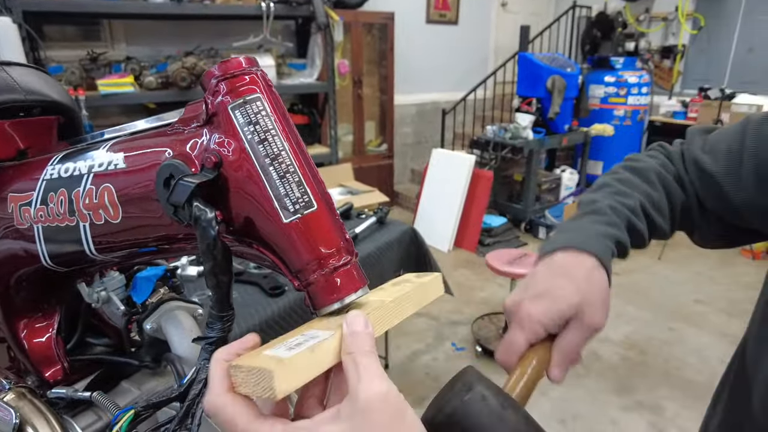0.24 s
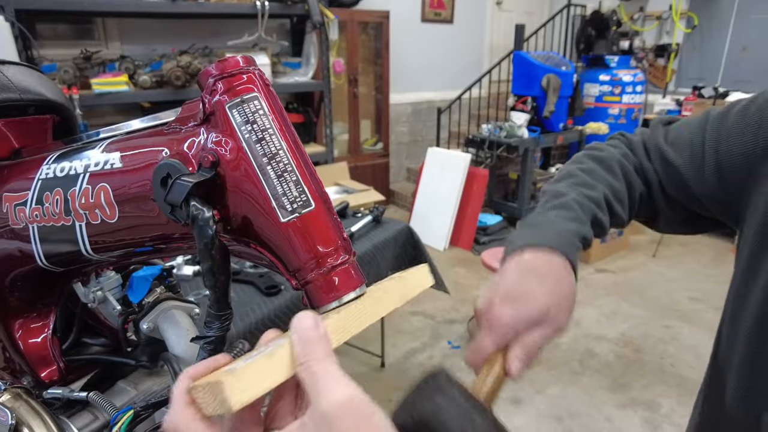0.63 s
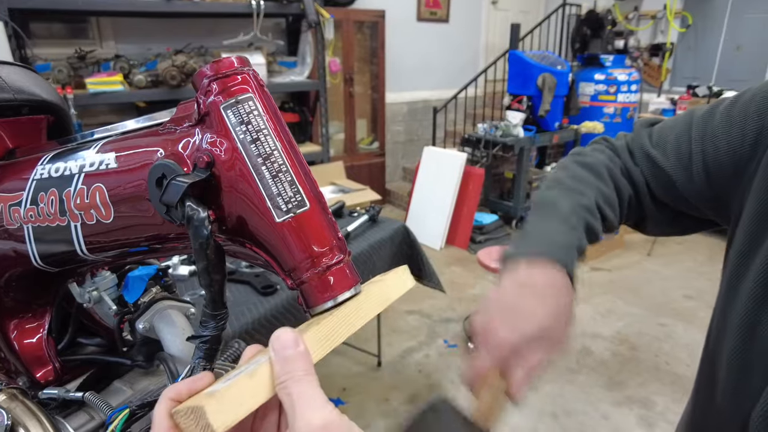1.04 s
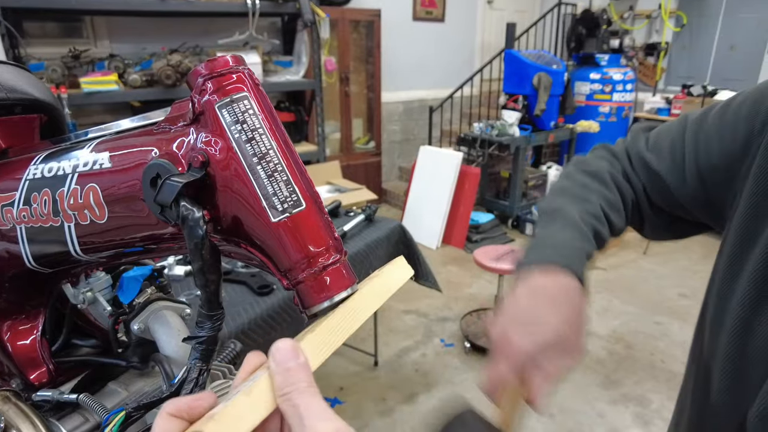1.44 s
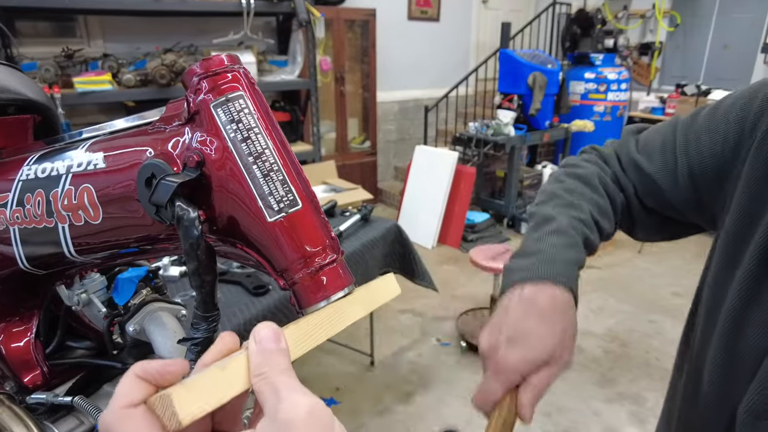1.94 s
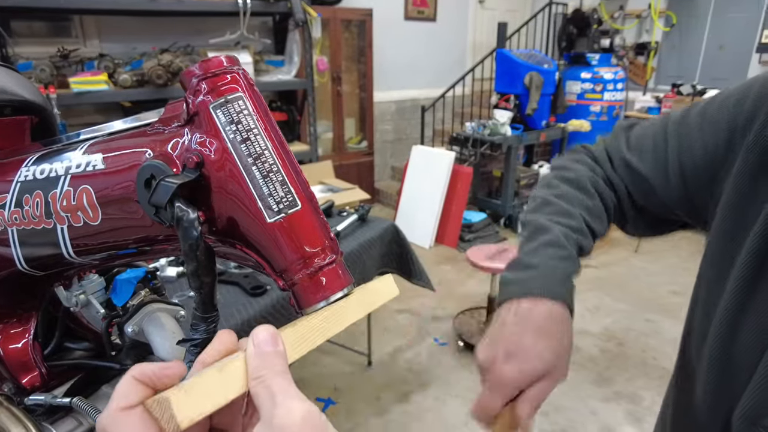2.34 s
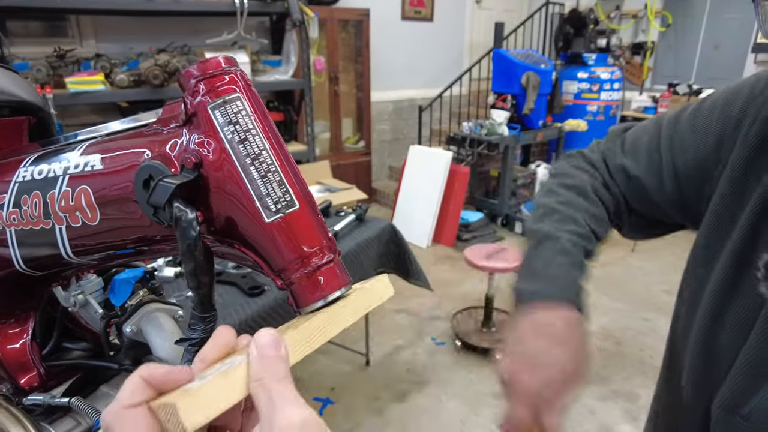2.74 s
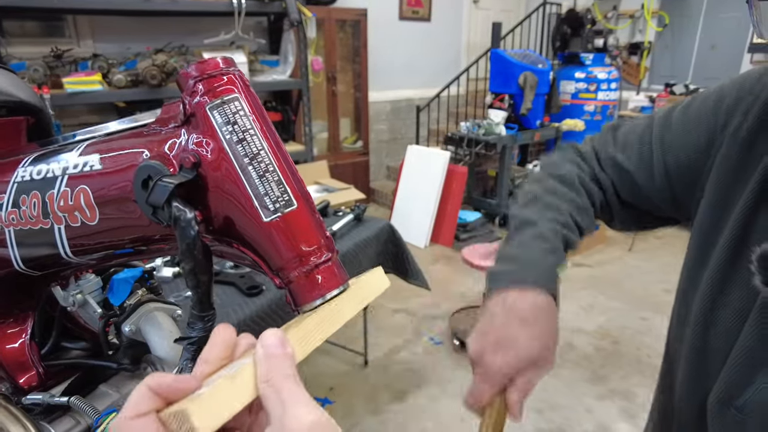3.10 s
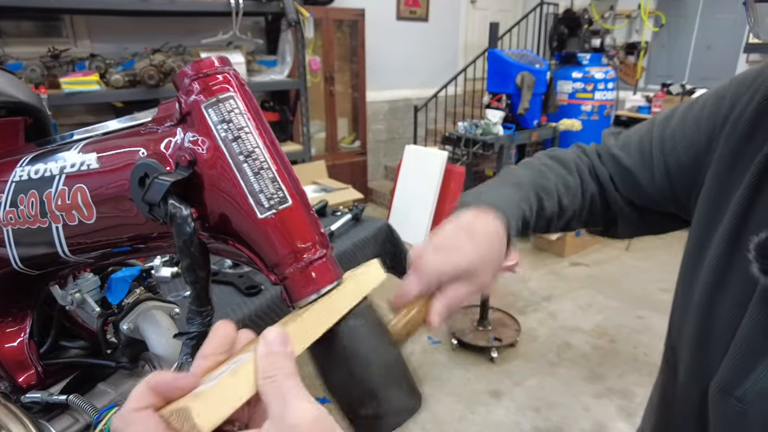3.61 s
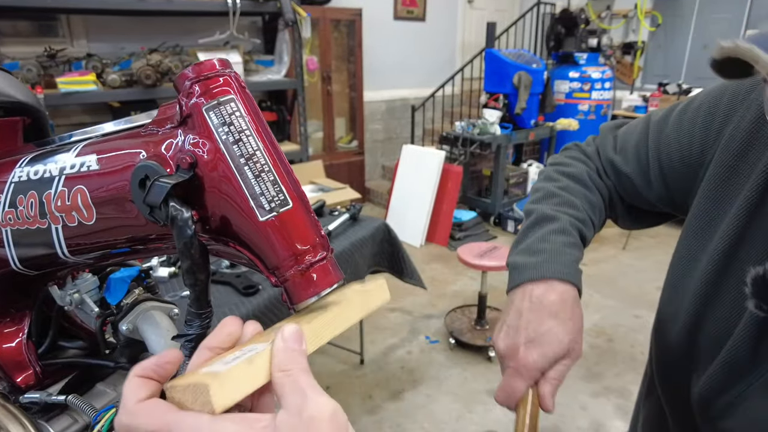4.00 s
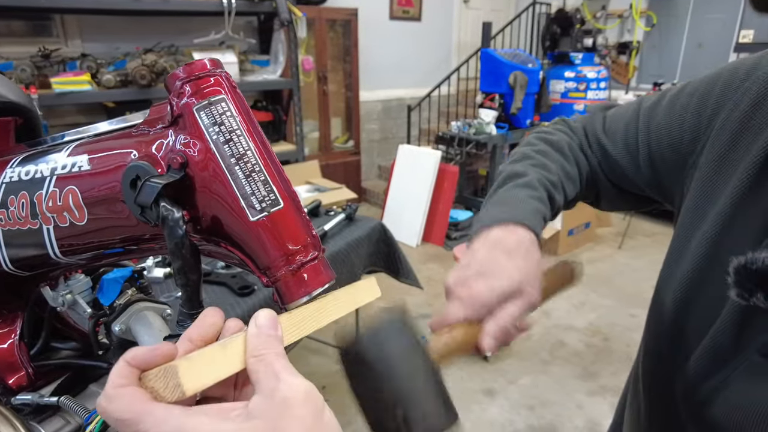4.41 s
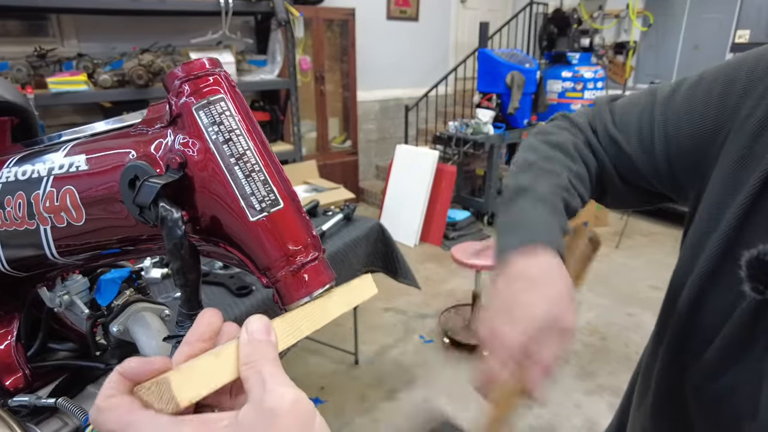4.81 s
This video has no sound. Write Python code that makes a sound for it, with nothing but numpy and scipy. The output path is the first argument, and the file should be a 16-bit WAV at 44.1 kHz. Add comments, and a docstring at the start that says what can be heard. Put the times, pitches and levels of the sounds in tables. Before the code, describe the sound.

A rubber mallet hits a wooden block held against a steel frame, heard close up in a concrete workshop. At the start, the tail of an earlier blow fades, and the block taps lightly at about 0.5 seconds. From 0.9 to 3.6 seconds come eight sharp, hollow knocks, evenly spaced at nearly three a second. The one at 1.8 seconds is clearly softer, and the later ones are firm. Each knock leaves a faint metallic hum and a short room echo. The hammering pauses while the block taps softly against the frame around 4.0 and 4.2 seconds. One more solid knock lands at 4.7 seconds and dies away. Between blows a sleeve rustles very faintly, and a slight low rumble of air comes with each swing, over a very quiet background hush.

```python
"""Mallet on a wooden block

A rubber mallet knocks a wooden block held against a steel frame in a concrete workshop.
The block's modes give a short hollow knock, the frame rings on faintly, the room carries the tail.
Between blows the block taps the frame and a sleeve rustles. Moving air rumbles at the microphone,
swelling with each swing, over a steady hush that dips briefly."""
import sys
import numpy as np
from scipy import signal
from scipy.fft import rfft, irfft, next_fast_len
from scipy.io import wavfile
from scipy.ndimage import uniform_filter1d

SR = 44100
rng = np.random.default_rng(int(sys.argv[2]) if len(sys.argv) > 2 else 0)


def put_to_file(sound):
    """Save the sound as 16-bit audio at rate SR, in the file named by the first command-line argument."""
    columns = np.atleast_2d(sound).T  # one column per channel
    safe = np.clip(columns, -1, 1)
    whole_steps = np.round(safe * 32767)
    wavfile.write(sys.argv[1], SR, whole_steps.astype(np.int16))


N = 222749
LEAD = SR // 2  # samples before the start, so an earlier blow still rings

# mallet blows (time [s], knock [dB], pitch [Hz], then
# hollow, slap, tick, crack, lower hum, upper hum, steel ring [dB re knock])
BLOWS = [(-.17, -12, 745, -15, -2.5, 1, -15.5, -36, -22, -58),
         (0.94, -10.5, 755, -2.5, -6.5, -8, -20, -48, -29, -68),
         (1.2902, -6.5, 747, -18, -4.5, -8, -17.5, -30.5, -25, -54),
         (1.7601, -17.5, 683, -4, -11, -15.5, -23.5, -27.5, -23, -62),
         (2.095, -6.5, 814, -17.5, -4.5, -5, -17, -22.5, -24, -54),
         (2.4876, -7.5, 738, -15.5, -1.5, 2, -12.5, -29, -18.5, -45),
         (2.8685, -5.5, 702, -10, -7, -4.5, -15, -30.5, -20.5, -45.5),
         (3.2389, -6, 737, -13, 1, -4, -14, -26, -25.5, -50.5),
         (3.6167, -3.5, 793, -7, -9, -6, -18.5, -24.5, -33.5, -53),
         (4.6954, -8, 822, -9, -9.5, -11.5, -21, -42, -33, -61)]
# block set against the frame (time [s], knock [dB], pitch [Hz], then thud, slap, tick [dB re knock])
TAPS = [(0.4853, -33.5, 740, -10.5, -10, -12), (3.9753, -37.5, 666, -2.5, -16, -24),
        (4.026, -42, 867, -6, -4.5, -9), (4.2232, -36.5, 767, -10, -20, -14)]
# hand-damped modes of block and mallet head (frequency [Hz], level [dB], t60 [s])
THUD_MODES = [(81, -16, 0.13), (110, -4, 0.22), (146.5, -0.5, 0.15), (174.1, 4, 0.09), (276, -0.5, 0.072),
              (372.8, 2.5, 0.078)]
KNOCK_MODES = [(568, -2.5, 0.028), (653, 2, 0.027), (738.3, 5, 0.03), (872, 4, 0.024), (959, 3.5, 0.014)]
SLAP_MODES = [(1170, -4, 0.019), (1375, 0, 0.046), (1436, 3, 0.025), (1911, 2.5, 0.017)]
TICK_MODES = [(2273, 1.5, 0.017), (2750, -0.5, .013), (3260, -6, 0.0086)]
# main block mode, ringing on in a loose grip (frequency [Hz], level [dB], t60 [s])
HOLLOW_MODE = [(747.5, -2, .1)]
# contact noise; the snap is its first, brightest instant (frequency [Hz], level [dB])
CRACK_SPECTRUM = [(2500, -8.5), (3600, -1), (4500, -6), (5500, -1.5), (7500, -5.5), (9000, -10),
                  (11000, -27), (13000, -25.5), (16000, -37.5)]
SNAP_SPECTRUM = [(3000, -17.5), (7000, -4.5), (11000, -8.5), (13000, -8), (16000, -20)]
# steel frame modes (frequency [Hz], level [dB], t60 [s])
LOWER_HUM_MODES = [(287.8, 0, 0.97), (307, 0.5, 1), (334, -9, 1)]
UPPER_HUM_MODES = [(353.2, -6, 1), (365.6, 1, 0.64), (376.3, 0.5, 0.87), (385, -2.5, 0.68),
                   (552, -5.5, 0.57), (794, -14.5, 0.32)]
CLANG_MODES = [(1402, -29, 0.45), (1433, -25.5, .6), (1476, -28.5, 0.4), (1895, -30, 0.28),
               (2234, -32.5, .35)]
STEEL_MODES = [(13400, -8.5, .33), (13840, -3, .3), (14180, -18.5, .25)]
# near surfaces (delay [s], level [dB])
ECHOES = [(.0043, -7.5), (.0078, -10.5), (0.0116, -4.5), (0.0145, -15), (0.0177, -12), (.0246, -12.5),
          (0.0313, -10.5)]
# room decay (frequency [Hz], t60 [s])
ROOM_T60 = [(60, 1), (160, 0.75), (420, 0.61), (1100, 0.79), (1500, 0.83), (2900, 0.66), (7700, 0.55),
            (14000, 0.28)]
# tail colour (frequency [Hz], level [dB])
ROOM_SPECTRUM = [(60, 3), (150, 6.5), (350, 9), (750, 1), (1100, 1.5), (1500, 1.5), (2500, -6.5),
                 (4300, -10), (6500, -5), (10000, -14), (15000, -39)]
# band centres (thud, knock, slap, tick, crack [Hz])
BANDS_HZ = [200, 750, 1600, 2600, 6000]
# slow jolt of the microphone stand and a lingering low room boom
# (frequency [Hz], level [dB re knock], t60 [s])
LOW_MODES = [(15, -21.5, .3), (78.4, -34.5, 0.83)]
# moving air (frequency [Hz], level [dB])
AIR_SPECTRUM = [(3, -29), (10, 2), (25, -9), (65, -19), (130, -41), (20000, -86)]
# background hush (frequency [Hz], level [dB])
HUSH_SPECTRUM = [(35, -25.5), (60, -10), (168, -19), (301, -11), (700, -17), (3000, -31), (4000, -40),
                 (5000, -31.5), (7000, -40), (13000, -48.5), (15500, -63)]
# hush envelope (time [s], level [dB])
HUSH_LEVELS = [(0, -57.5), (.74, -65.5), (0.899, -73.5), (.95, -62.5), (5.05, -62)]
# sleeve and hand sliding (time [s], length [s], level [dB])
RUSTLES = [(0.088, 0.089, -71.5), (0.305, 0.057, -72.5), (0.49, 0.072, -72.5), (.68, 0.085, -74.5),
           (1.245, 0.028, -71), (1.666, 0.056, -73), (2.004, 0.043, -74), (2.418, 0.076, -73),
           (2.81, 0.1, -75), (3.18, .04, -69), (3.532, 0.056, -71.5), (4.077, 0.037, -80),
           (4.381, 0.04, -76), (4.555, 0.091, -78)]
RUSTLE_HZ = 6670
# cloth friction (frequency [Hz], level [dB])
RUSTLE_SPECTRUM = [(500, -24), (0.34 * RUSTLE_HZ, -12), (0.97 * RUSTLE_HZ, 0), (1.2 * RUSTLE_HZ, 0),
                   (1.6 * RUSTLE_HZ, -14), (20000, -40)]

KNOCK_REF_HZ = 745  # pitch at which knock and hollow modes are listed; the grip shifts them
THUD_DB, THUD_PER_KNOCK_DB = -7, -0.32  # softer blows are duller
TAIL_DB, TAIL_PER_CRACK_DB = 7, 0.4029  # a harder crack excites more room
CRACK_T60_S, SNAP_T60_S, SNAP_RE_CRACK_DB = 0.03, 0.005, -10.5
AIR_DB, GUST_RE_KNOCK_DB, GUST_LEAD_S, GUST_WIDTH_S = -56.5, -42, 0.044, 0.085
LAST_SWING_S, LAST_SWING_DB = 5.09, -6  # gust only, under way at the end
HEADROOM, CUTOFF_HZ = 1.3, 16300


def amp(db):
    return 10 ** (np.asarray(db) / 20)


def unit_rms(x):
    return x / np.sqrt(np.mean(x ** 2) + 1e-20)


def curve_at(points, hz):
    """Interpolate over log frequency."""
    points_hz, values = np.transpose(points)
    return np.interp(np.log(hz + 1), np.log(points_hz + 1), values)


def add(mix, time_s, sound):
    part = mix[round(time_s * SR) + LEAD:][:len(sound)]
    part += sound[:len(part)]


def noise(spectrum, size):
    """Coloured noise, rms 1."""
    fft_size = next_fast_len(size)
    gain = amp(curve_at(spectrum, np.fft.rfftfreq(fft_size, 1 / SR)))
    return unit_rms(irfft(rfft(rng.standard_normal(fft_size)) * gain, fft_size)[:size])


def flutter(size, depth_db, smooth_samples):
    """Randomly wavering gain."""
    return amp(depth_db * unit_rms(uniform_filter1d(rng.standard_normal(size), smooth_samples)))


def ring(modes, t, rise_s, shift=1):
    """Damped sines that swell during contact."""
    hz, db, t60_s = np.transpose(modes)[:, :, None]
    sines = amp(db - 60 * t / t60_s) * np.sin(2 * np.pi * hz * shift * t)
    return sines.sum(0) * (1 - np.exp(-t / rise_s)) ** 2


def near_echoes(x):
    """Bench, floor and wall reflections; block and arms stand a little differently each time."""
    response = np.zeros(SR // 10)
    for delay_s, db in ECHOES:
        level_jitter, delay_jitter = rng.standard_normal(2)
        response[round(abs(delay_s + 0.0003 * delay_jitter) * SR)] += amp(db + 1.1 * level_jitter)
    return signal.fftconvolve(x, response)[:len(x)]


def wood_block(t, pitch_hz, thud_db, slap_db, tick_db, crack_db, echo_db):
    """Wood modes and contact noise, with near echoes."""
    wood = ring(KNOCK_MODES, t, rise_s=0.00085, shift=pitch_hz / KNOCK_REF_HZ)
    wood += amp(thud_db) * ring(THUD_MODES, t, rise_s=0.0031)
    wood += amp(slap_db) * ring(SLAP_MODES, t, rise_s=0.00057)
    wood += amp(tick_db) * ring(TICK_MODES, t, rise_s=0.00064)
    crack = amp(crack_db - 60 * t / CRACK_T60_S) * noise(CRACK_SPECTRUM, len(t))
    crack *= 1 - np.exp(-t / 0.00023)
    echoes = amp(echo_db) * near_echoes(0.49 * wood + 0.79 * crack)  # rough surfaces return less treble
    snap = amp(crack_db + SNAP_RE_CRACK_DB - 60 * t / SNAP_T60_S) * noise(SNAP_SPECTRUM, len(t))
    return 0.59 * wood + 1.29 * crack + echoes + snap


def steel_frame(t, slap_db, lower_db, upper_db, steel_db):
    """Frame modes: two hums, a clang that follows the slap, a fluttering high ring."""
    hum = amp(lower_db) * ring(LOWER_HUM_MODES, t, rise_s=0.013)
    hum += amp(upper_db) * ring(UPPER_HUM_MODES, t, rise_s=0.0055)
    clang = amp(slap_db) * ring(CLANG_MODES, t, rise_s=0.005)
    high_ring = amp(steel_db) * ring(STEEL_MODES, t, rise_s=0.006)
    return hum + clang + high_ring * flutter(len(t), depth_db=4, smooth_samples=400)


def room_tail(t, thud_db, slap_db, tick_db, crack_db):
    """Dense echoes blur the modes into broad bands, each decaying at its own rate."""
    pulses = np.zeros(len(t))
    slots = np.arange(0, len(t) - 10, 10)
    pulses[slots + rng.integers(0, 10, len(slots))] = rng.choice([-1., 1.], len(slots))
    hz, frame_s, bands = signal.stft(pulses, SR, nperseg=512)
    balance = np.transpose([BANDS_HZ, [thud_db, 0, slap_db, tick_db, crack_db]])
    colour = amp(curve_at(ROOM_SPECTRUM, hz) + curve_at(balance, hz))
    decay = amp(-60 * frame_s / curve_at(ROOM_T60, hz)[:, None])
    _, tail = signal.istft(bands * colour[:, None] * decay, SR, nperseg=512)
    build_up = 1 - np.exp(-t / 0.0032)
    return tail[:len(t)] * build_up


def impact(knock_db, pitch_hz, bands_db, frame_db, tail_db, echo_db=0):
    """Block, frame and room together, faded out over 0.5 s."""
    thud_db, slap_db, tick_db, crack_db = bands_db
    t = np.arange(SR // 2) / SR
    block = wood_block(t, pitch_hz, thud_db, slap_db, tick_db, crack_db, echo_db)
    frame = steel_frame(t, slap_db, *frame_db)
    room = amp(tail_db) * room_tail(t, *bands_db)
    fade = np.sqrt(abs(np.cos(np.pi * t)))
    return amp(knock_db) * (block + frame + room) * fade


def mallet_blow(knock_db, pitch_hz, hollow_db, slap_db, tick_db, crack_db, *frame_db):
    """Full impact, plus hollow ring, slow jolt of the microphone stand and low room boom."""
    thud_db = THUD_DB + THUD_PER_KNOCK_DB * knock_db
    tail_db = TAIL_DB + TAIL_PER_CRACK_DB * crack_db
    struck = impact(knock_db, pitch_hz, (thud_db, slap_db, tick_db, crack_db), frame_db, tail_db)
    t = np.arange(len(struck)) / SR
    hollow = amp(hollow_db) * ring(HOLLOW_MODE, t, rise_s=0.0012, shift=pitch_hz / KNOCK_REF_HZ)
    lows = ring(LOW_MODES, t, rise_s=0.012) * np.cos(np.pi * t)
    return struck + amp(knock_db) * (hollow + lows)


def air_rumble(t):
    """Low air noise; each swing pushes a gust ahead of the blow."""
    swings = [row[:2] for row in BLOWS] + [(LAST_SWING_S, LAST_SWING_DB)]
    gusts = sum(amp(db + GUST_RE_KNOCK_DB) * np.exp(-((t - time_s + GUST_LEAD_S) / GUST_WIDTH_S) ** 2)
                for time_s, db in swings)
    return noise(AIR_SPECTRUM, len(t)) * (amp(AIR_DB) + gusts)


def hush(t):
    """Background noise; the level dips briefly."""
    return noise(HUSH_SPECTRUM, len(t)) * amp(np.interp(t, *np.transpose(HUSH_LEVELS)))


def sleeve_rustle(length_s, db):
    """Sliding cloth: a short swell of grainy treble noise."""
    size = round(length_s * SR)
    grain = flutter(SR // 2, depth_db=3, smooth_samples=150)
    friction = noise(RUSTLE_SPECTRUM, len(grain)) * grain
    return amp(db) * friction[:size] * signal.windows.tukey(size, 0.6)


def block_tap(knock_db, pitch_hz, thud_db, slap_db, tick_db, crack_db=-30):
    """Block set against the frame by hand: a light, dry impact."""
    return impact(knock_db, pitch_hz, (thud_db, slap_db, tick_db, crack_db),
                  frame_db=(-32.5, -32.5, -62), tail_db=-5, echo_db=-5)


def scene():
    mix = np.zeros(LEAD + N)
    for source, events in (sleeve_rustle, RUSTLES), (mallet_blow, BLOWS), (block_tap, TAPS):
        for time_s, *settings in events:
            add(mix, time_s, source(*settings))
    t = np.arange(N) / SR
    return (mix[LEAD:] + air_rumble(t) + hush(t))[None]


def record(dry):
    """Soft saturation, then low-pass."""
    saturated = HEADROOM * np.tanh(dry / HEADROOM)
    lowpass = signal.firwin(511, CUTOFF_HZ, window=("kaiser", 9), fs=SR)
    return signal.oaconvolve(saturated, lowpass[None], "same")


dry = scene()
out = record(dry)
put_to_file(out)
```